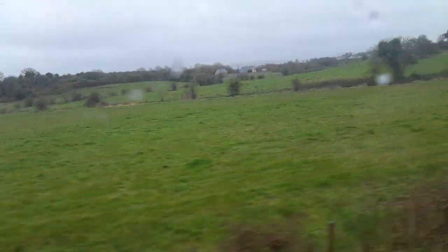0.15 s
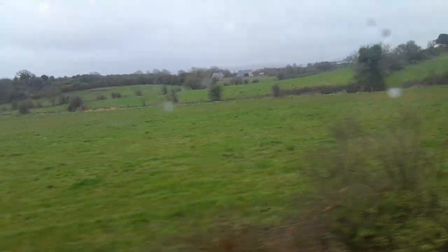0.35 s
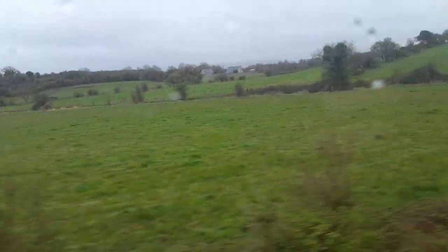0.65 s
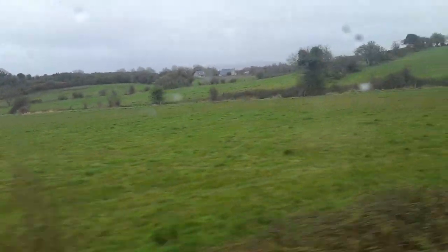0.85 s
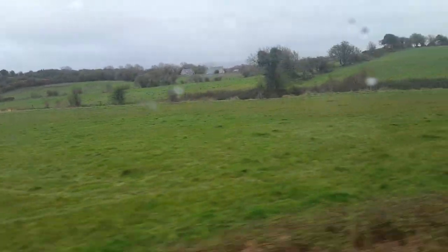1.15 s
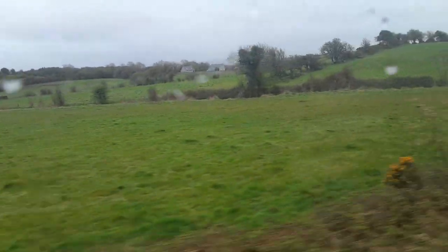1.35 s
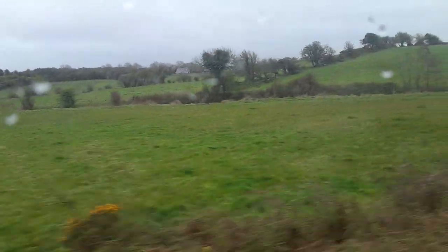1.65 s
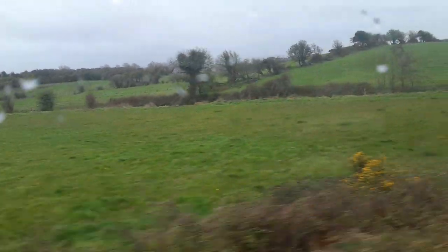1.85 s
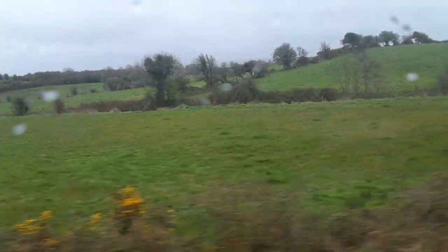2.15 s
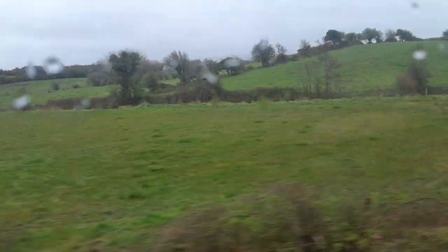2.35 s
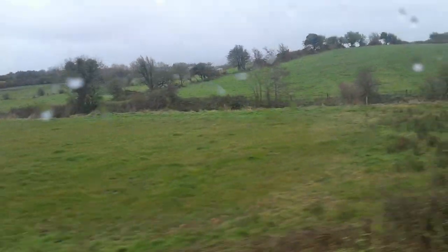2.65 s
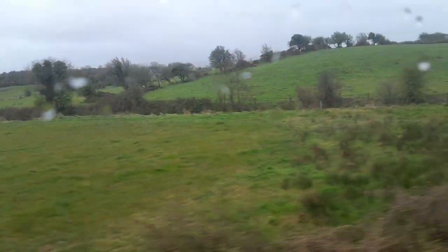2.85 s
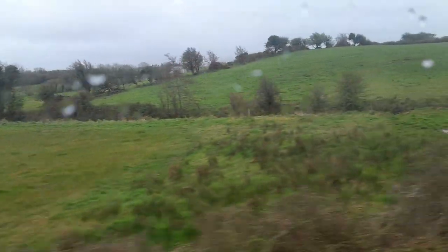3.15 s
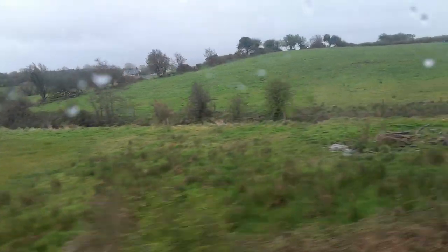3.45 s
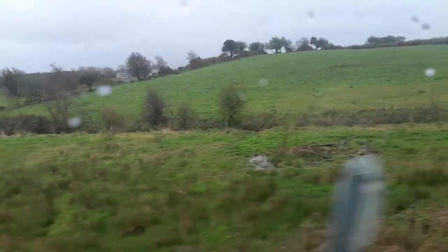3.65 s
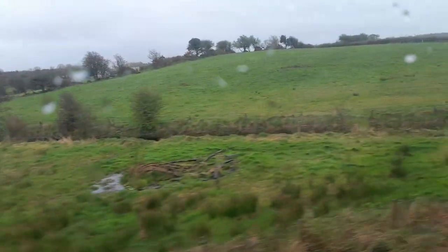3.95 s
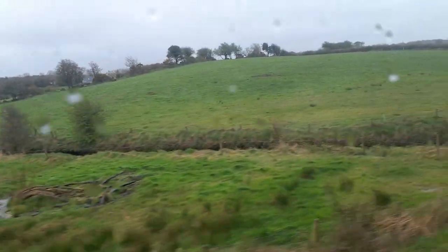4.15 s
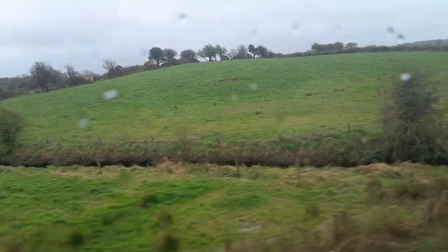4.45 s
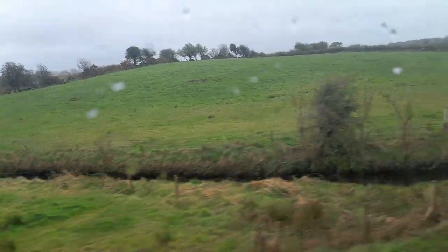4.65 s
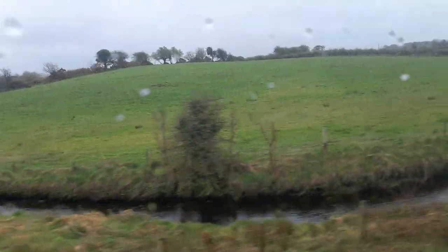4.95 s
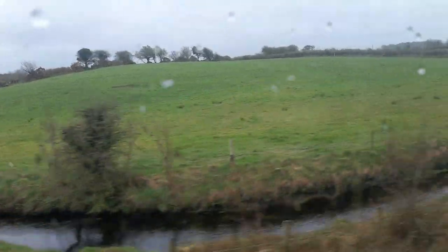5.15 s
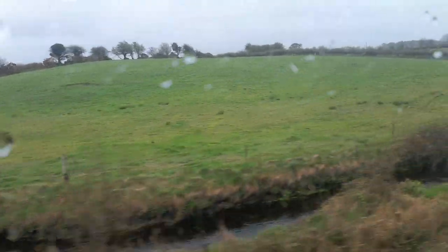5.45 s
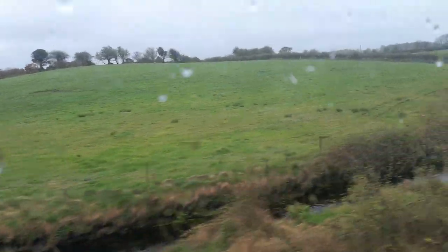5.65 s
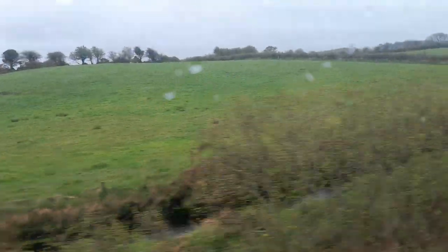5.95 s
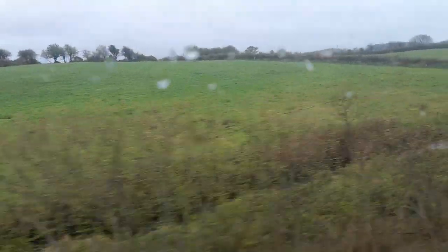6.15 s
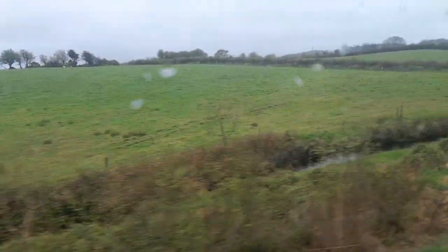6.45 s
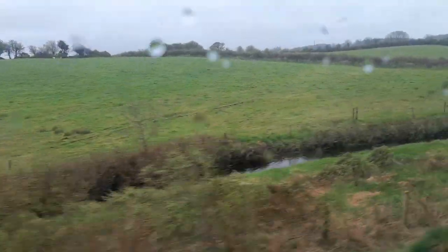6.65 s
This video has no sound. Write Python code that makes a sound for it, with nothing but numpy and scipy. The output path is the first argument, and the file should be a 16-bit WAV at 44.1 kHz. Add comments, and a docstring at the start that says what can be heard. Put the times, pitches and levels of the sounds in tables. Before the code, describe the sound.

Train carriage rumble with soft jolts, an engine surging up and falling away, a sharp burst of air, then a loud steady bass drone.

```python
"""First heard: wheels rumbling on the rails and the carriage air booming, from a window seat in a diesel train.
The underfloor engine revs up, sinks back, and after a puff from an air valve pulls with a loud steady drone.
Engine and machinery are sums of sines; air, wheels, panels and valves are shaped stereo noise.
A loose fitting ticks once per engine cycle while the engine revs.
Behind the microphone, an automatic gain ducks everything under the loud drone."""
import sys
import numpy as np
from scipy import signal
from scipy.fft import rfft, irfft, next_fast_len
from scipy.io import wavfile
from scipy.ndimage import uniform_filter1d, minimum_filter1d, map_coordinates

SR = 44100
rng = np.random.default_rng(int(sys.argv[2]) if len(sys.argv) > 2 else 0)


def unload_wav(signal):
    """Save mono or channel-first audio to the path in sys.argv[1] as 16-bit WAV at rate SR, clipped to [-1, 1]."""
    wavfile.write(
        sys.argv[1],
        SR,
        np.round(np.clip(np.atleast_2d(signal).T, -1, 1) * 32767).astype(np.int16),
    )


N = 300321

# Source levels are those ahead of the automatic gain. Tone tables give only the shape of a noise.

# Engine under the floor: speed [t/s, firing rate f/Hz]
ENGINE_SPEED = [(0, 50.13), (2.25, 48.87), (2.45, 55.4), (2.72, 65.35), (3.19, 86.65), (3.44, 96.16),
                (3.7, 101.6), (4.0, 99.3), (4.3, 94.05), (4.6, 75), (5.15, 58.47), (5.31, 73.5),
                (5.6, 77.4), (5.85, 76.6), (6.8, 76.64)]
# Engine load [t/s, level/dB against full load]
ENGINE_LOAD = [(0, -33), (1.9, -34.5), (2.24, -17), (2.36, 0), (3.55, 0.5), (3.7, -10.5), (4.3, -14),
               (4.7, -28.5), (5.15, -10.5), (5.26, -27.5), (5.32, -7), (5.7, 0.5), (6.8, 1)]
# Passage of engine tones into the carriage: two air modes, a dead spot between, then panels [f/Hz, level/dB]
CABIN_PASSAGE = [(45, -29.5), (53, -21), (66, -8), (76, -6.5), (82, -7.5), (88, -23), (92, -22), (98, -8.5),
                 (110, -18), (131, -6.5), (153, -12), (183, -14.5), (205, -15)]
# Floor resonance, as it passes the third harmonic of firing [harmonic f/Hz, level/dB against the octave]
FLOOR_RESONANCE = [(140, -11.5), (190, -8.5), (222, -8), (240, -21), (270, -16.5)]
# Weaker engine tones from unequal cylinders [multiple of the cycle rate, level/dB against the octave]
WEAK_ORDERS = [(9, -13), (10, -6.5), (14, -16.5), (15, -14.5), (21, -16.5), (24, -14.5), (30, -20.5)]
# Trim panels' effect on the weaker engine tones [f/Hz, level/dB]
TRIM_DAMPING = [(110, -0.5), (200, -.5), (255, -3), (305, 1.5), (335, -10.5), (420, -12)]
CYLINDERS = 6  # all fire once per cycle
OCTAVE_DB, OCTAVE_LOAD_SHARE = -9.5, 0.54  # octave against firing tone; how much it follows the load in dB
STRAIN_DB, STRAIN_HZ_PER_S = 1, 32  # overtones harden by this much when the firing rate rises this fast

# Steady booming of the carriage air [t/s, level/dB]
BOOM_LEVEL = [(0, -21), (2.1, -21), (2.5, -22), (4.6, -24.5), (6.8, -23)]
# Track jolts that swell the boom [t/s, level/dB]
TRACK_JOLTS = [(.55, -19), (1.03, -16.5), (1.24, -15), (1.35, -18.5), (1.56, -17), (1.92, -14.5),
               (2.06, -16.5), (3.22, -18.5), (5.15, -24)]
JOLT_HALF_S = 0.054
# Lowest air mode of the carriage [f/Hz, level/dB]
BOOM_SHAPE = [(15, -56.5), (25, -34.5), (35, -22.5), (50, -16.5), (66, -6.5), (76, -2), (84, -7.5),
              (94, -15.5), (125, -15.5), (160, -22), (250, -90.5)]

# Slow change of all the rolling noise [t/s, level/dB]
ROLLING_LEVEL = [(0, 0.84), (1.7, -0.6), (2.4, 0.3), (3.3, 0.4), (4.9, .3), (5.6, -0.3), (6.8, -1)]
# Rough rail [t/s, half length/s, panel rumble change level/dB, wheel roar change level/dB]
ROUGH_PATCHES = [(0.014, .08, 2.5, 6.5), (0.271, 0.06, -0.5, 5.5), (0.98, .1, -1.5, 2.5),
                 (1.454, .1, 1, 0.5), (2.056, 0.045, -4, 3.5), (2.48, 0.13, 3.5, 2.5), (3.875, 0.2, 4.5, 2),
                 (4.378, 0.046, 3.5, 1), (5.272, .05, 2, 1.5)]
RAIL_PATCH_SHARE = 0.52  # how much of the roar's change in dB the rail hiss shares
# Smooth-track levels in dB, before the slow change
PANEL_DB, ROAR_DB, RAIL_DB, HIGH_DB, FINE_DB = -26.5, -37.5, -42, -53.5, -68
# Panel rumble [f/Hz, level/dB]
PANEL_SHAPE = [(70, -22.5), (98, -6.5), (122, 0.5), (160, -2), (200, -2), (235, -1.5), (280, -7.5),
               (310, -6), (345, -8), (400, -11), (460, -20.5), (700, -64.5)]
# Wheel roar [f/Hz, level/dB]
ROAR_SHAPE = [(300, -29.5), (450, -1.5), (530, 2), (660, 1.5), (780, -2), (900, -3.5), (1050, -8.5),
              (1400, -15.5), (3000, -66)]
# Rail hiss [f/Hz, level/dB]
RAIL_SHAPE = [(700, -3), (1200, 2.5), (1800, 1.5), (2250, -1), (2600, -2), (3000, -3.5), (3900, -6.5),
              (4700, -14), (8000, -32), (16000, -64.5)]
# High hiss, rolling and swishes [f/Hz, level/dB]
HIGH_SHAPE = [(3000, -14.5), (4600, 1.5), (6000, 2), (7400, 1.5), (8300, -2.5), (9000, -17), (10300, -22.5),
              (15800, -21.5)]
# Finest hiss, also the shape of the microphone chain's own noise [f/Hz, level/dB]
FINE_SHAPE = [(7000, -21.5), (9000, -1), (10500, -2), (12300, 3.5), (15800, 2.5)]

# Air valves blowing off [t/s, jet level/dB before a 1.5 dB cut, jet t60/s, fizz level/dB, fizz hold/s,
# fizz t60/s, level/dB of each pipe resonance against the jet, first pipe f/Hz, second pipe f/Hz]
VALVE_PUFFS = [(1.564, -30, 0.41, -38.5, 0.1, 0.55, -7, 2460, 4224),
               (4.416, -38, 0.27, -38, .01, 0.27, -6, 2280, 5586),
               (5.145, -39, 0.52, -48.5, 0.027, 0.81, -8.5, 4186, 7250),
               (5.177, -21.5, 0.43, -30.5, 0.014, .24, -9.5, 2310, 4063),
               (5.52, -37, .35, -51, 0.013, 0.25, -8, 3450, 3830)]
# Air jet [f/Hz, level/dB]
JET_SHAPE = [(600, -28), (950, 3), (1300, -6.5), (1950, -4.5), (2350, -4), (2900, 0), (3500, 1.5),
             (4250, -2), (4800, -2.5), (5700, -0.5), (7800, -4), (8900, -13), (12000, -34)]
# Fine fizz of the valves [f/Hz, level/dB]
FIZZ_SHAPE = [(4000, -35.5), (7500, -7.5), (9500, -9), (11000, -2.5), (12500, 1), (15000, -0.5),
              (16000, -2.5)]

# Shaking of the loose fitting by the engine [t/s, tick level/dB before the attack]
FITTING_SHAKE = [(2.45, -47), (2.7, -41.5), (3.25, -37.5), (3.48, -36), (3.8, -45.5), (4.35, -49.5)]
# Stray ticks of the fitting [t/s, level/dB before the attack]
STRAY_TICKS = [(.785, -46), (6.495, -33.5), (6.722, -39.5)]
# Scrape of the fitting [f/Hz, level/dB]
TICK_SHAPE = [(3000, -43), (6000, -13.5), (8000, -9.5), (10500, -14.5), (11400, -6.5), (12100, -0.5),
              (13000, -6.5), (14000, -6), (15500, -3.5)]
TICK_SYNC_S, TICK_SCATTER_DB = 2.941, 2  # moment from which cycles are counted; spread from tick to tick

# Wall panel's drumming near 350 Hz, with a short surge as the engine takes up its pull [t/s, level/dB]
PANEL_DRUMMING = [(0, -35), (2.1, -36.5), (2.7, -48), (4.1, -45), (4.4, -38), (5.15, -47.5), (5.29, -32.5),
                  (5.38, -52), (6.8, -57.5)]
# On-board machinery tones, and two higher engine tones that join as the engine takes up its pull [start t/s,
# f/Hz, level/dB]
MACHINE_HUM = [(0, 312, -41.5), (0, 648, -61), (5.0, 533, -46), (5.0, 921, -53.5)]
# Soft treble swells [t/s, half length/s, high hiss level/dB, finest hiss level/dB]
SOFT_SWISHES = [(.45, 0.058, -65.5, -58), (0.866, 0.066, -64.5, -66), (2.3, .15, -53.5, -58.5),
                (3.251, .12, -54, -57), (5.993, .07, -51.5, -52), (6.22, 0.12, -49, -53),
                (6.476, 0.034, -52, -50)]
SING_S, SING_HALF_S, SING_DB = .5, .4, -49.5  # faint wheel song: middle, half length, peak
LEAK_S, LEAK_HALF_S, LEAK_DB = 4.95, .42, -55.5  # thin hiss: middle, half length, peak

# Likeness of the two channels in the carriage [f/Hz, left-right correlation]
STEREO_LIKENESS = [(60, 1), (125, 0.92), (250, 0.91), (500, 0.48), (1000, -0.21), (2000, -0.053),
                   (4000, -0.14), (12000, 0.047)]
# Stereo lean of the carriage noise [f/Hz, left minus right level/dB]
STEREO_BALANCE = [(60, 1.8), (200, 1), (400, 0), (1200, 0.5), (2400, -3), (4400, -4), (7000, 0), (10000, 9),
                  (14000, 3.5)]

# Microphone chain
THRESHOLD_DB, MAX_CUT_DB = -14.5, 6  # level where the automatic gain starts; deepest cut
METER_S, HOLD_S, GLIDE_S = 0.035, 0.43, 0.29  # listening time, hold, time constant of the gain's movement
SELF_NOISE_DB, TOP_HZ = -61, 15900  # own hiss, added after the gain; band limit


def amp(db):
    """Decibels to gain."""
    return 10 ** (np.asarray(db) / 20)


def unit(x):
    """Scale to rms 1."""
    return x / np.sqrt(np.mean(x ** 2) + 1e-20)


def along(points, hz):
    """Read (f/Hz, value) points on a log frequency axis."""
    f, v = np.transpose(points)
    return np.interp(np.log(hz + 1), np.log(f), v)


def curves(rows):
    """One value per sample for each column after the time."""
    s, *cols = np.transpose(rows)
    return [np.interp(np.arange(N) / SR, s, c) for c in cols]


def wobble(rate):
    """A smooth random curve, rate knots a second."""
    knots = rng.standard_normal(int(N * rate / SR) + 4)
    return map_coordinates(knots, [np.arange(N) * rate / SR])


def swell(s, half_s):
    """A smooth rise and fall of height 1 around time s."""
    return np.exp(-((np.arange(N) / SR - s) / half_s) ** 2)


def filtered(x, response):
    """Multiply the spectrum of x by a response of frequency."""
    m = next_fast_len(N + SR // 2)
    return irfft(rfft(x, m) * response(np.fft.rfftfreq(m, 1 / SR)), m)[..., :N]


def panned(x, left_db):
    """Lean a sound to the left by a level difference."""
    return x * amp(left_db * np.array([[.5], [-.5]]))


def cabin_noise(shape, ripple_db=1.5):
    """Stereo noise of rms 1 in the carriage: alike in both channels in the bass, diffuse in the treble."""
    ripple = rng.standard_normal(SR // 60)
    ripple_hz = np.linspace(0, SR / 2, len(ripple))

    def mid_side(hz):
        # a random ripple over frequency, drawn anew for each noise, roughens its colour above the bass
        rough_db = ripple_db * np.minimum(hz / 600, 1) * np.interp(hz, ripple_hz, ripple)
        turn = np.arccos(np.clip(along(STEREO_LIKENESS, hz), -1, 1)) / 2
        return amp(along(shape, hz) + rough_db) * [np.cos(turn), np.sin(turn)]

    mid, side = filtered(rng.standard_normal((2, N)), mid_side)
    stereo = np.array([mid + side, mid - side])
    return unit(filtered(stereo, lambda hz: panned(1, along(STEREO_BALANCE, hz))))


def resonance(hz, width_hz):
    """Stereo noise of rms 1 ringing in one resonance."""
    def ring_twice(f):
        return (1j * f * width_hz / (hz * hz - f * f + 1j * f * width_hz)) ** 2

    return unit(filtered(rng.standard_normal((2, N)), ring_twice))


def engine_cycles():
    """Engine cycles completed at each sample."""
    return np.cumsum(curves(ENGINE_SPEED)[0]) / SR / CYLINDERS


def engine():
    """Firing pulses make a deep tone set by load and resonance; unequal cylinders add weaker cycle multiples."""
    hz, load_db = curves(ENGINE_SPEED)[0], curves(ENGINE_LOAD)[0]
    rise_hz_per_s = uniform_filter1d(np.gradient(hz) * SR, size=SR // 10)
    strain = np.clip(rise_hz_per_s / STRAIN_HZ_PER_S, 0, 1)
    firing_db = load_db + along(CABIN_PASSAGE, hz)
    octave_db = OCTAVE_DB + OCTAVE_LOAD_SHARE * load_db + STRAIN_DB * strain
    octave_db += along(CABIN_PASSAGE, 2 * hz)
    third_db = octave_db + along(FLOOR_RESONANCE, 3 * hz)
    cycle = 2 * np.pi * engine_cycles()
    phase = CYLINDERS * cycle
    drone = amp(firing_db + .25 * wobble(12)) * np.sin(phase)
    drone += amp(octave_db + .8 * wobble(10)) * np.sin(2 * phase)
    drone += amp(third_db + 1.5 * wobble(6)) * np.sin(3 * phase)
    for multiple, db in WEAK_ORDERS:
        waver_db, drift = 2 * wobble(5), .35 * wobble(6)
        trim_db = along(TRIM_DAMPING, multiple * hz / CYLINDERS)
        tone = np.sin(round(multiple) * cycle + drift + rng.uniform(0, 2 * np.pi))
        drone += amp(octave_db + db + trim_db + waver_db) * tone
    return panned(np.sqrt(2) * drone, left_db=2.1)  # root 2 turns rms levels into sine peaks


def boom():
    """The track keeps the lowest air mode of the carriage ringing; each jolt swells it."""
    ring = cabin_noise(BOOM_SHAPE)
    ring_rms = np.sqrt(np.abs(uniform_filter1d(np.mean(ring ** 2, axis=0), size=SR // 12)))
    steady_power = amp(curves(BOOM_LEVEL)[0]) ** 2
    jolt_power = sum((amp(db) * swell(s, JOLT_HALF_S)) ** 2 for s, db in TRACK_JOLTS)
    evened_ring = ring / (ring_rms + 0.013)
    return np.sqrt(steady_power + jolt_power) * evened_ring


def rolling():
    """Rail roughness shakes the panels and makes the wheels roar and hiss, changing on rough patches."""
    panel_rise = sum(db * swell(s, half_s) for s, half_s, db, _ in ROUGH_PATCHES)
    roar_rise = sum(db * swell(s, half_s) for s, half_s, _, db in ROUGH_PATCHES)
    roughness = wobble(12)
    rail_db = RAIL_DB + RAIL_PATCH_SHARE * roar_rise + 0.55 * roughness
    panels = amp(PANEL_DB + panel_rise + 0.78 * wobble(7.6)) * cabin_noise(PANEL_SHAPE)
    roar = amp(ROAR_DB + roar_rise + 0.48 * roughness) * cabin_noise(ROAR_SHAPE)
    rails = amp(rail_db) * cabin_noise(RAIL_SHAPE)
    high = amp(HIGH_DB + 1.4 * wobble(12)) * cabin_noise(HIGH_SHAPE)
    fine = amp(FINE_DB + 1.5 * wobble(9)) * cabin_noise(FINE_SHAPE)
    return amp(curves(ROLLING_LEVEL)[0]) * (panels + roar + rails + high + fine)


def air_valves(attack_s=0.0036):
    """Each valve opens sharply and rings its pipe; the jet fades with the pressure, the fizz may hang on."""
    jet_noise = cabin_noise(JET_SHAPE)
    fizz_noise = panned(cabin_noise(FIZZ_SHAPE), left_db=-3.5)
    out = np.zeros((2, N))
    for s, jet_db, jet_t60, fizz_db, hold, fizz_t60, pipe_db, *pipe_hz in VALVE_PUFFS:
        t = np.maximum(np.arange(N) / SR - s, 0)
        pipe = panned(sum(resonance(hz, width_hz=260) for hz in pipe_hz), left_db=-6.5)
        jet = amp(jet_db - 1.5 - 60 * t / jet_t60) * (jet_noise + amp(pipe_db) * pipe)
        fizz = amp(fizz_db - 60 * np.maximum(t - hold, 0) / fizz_t60) * fizz_noise
        opening = 1 - np.exp(-t / attack_s)
        out += opening * (jet + fizz)
    return out * amp(0.78 * wobble(110))  # jet and fizz flutter


def fitting(attack_s=0.0021, t60_s=0.088):
    """The loose fitting scrapes briefly and brightly once per engine cycle while shaken, plus stray ticks."""
    cycles = engine_cycles()
    cycles_from_sync = cycles - cycles[round(TICK_SYNC_S * SR)]
    times = np.flatnonzero(np.diff(np.floor(cycles_from_sync))) / SR
    shake_s, shake_db = np.transpose(FITTING_SHAKE)
    ticks = list(STRAY_TICKS)
    for s in times:
        if shake_s[0] < s < shake_s[-1]:
            scatter_db = TICK_SCATTER_DB * rng.standard_normal()
            ticks.append((s, np.interp(s, shake_s, shake_db) + scatter_db))
    level = np.zeros(N + SR)
    t = np.arange(SR // 4) / SR
    for s, db in ticks:
        level[round(s * SR):][:len(t)] += amp(db - 60 * t / t60_s) * (1 - np.exp(-t / attack_s))
    return panned(level[:N] * cabin_noise(TICK_SHAPE), left_db=-1.5)


def wall_panel():
    """A wall panel drums in one broad resonance, alike in both channels, its level wavering at random."""
    drum = panned(resonance(hz=349.5, width_hz=95)[0], left_db=1.0)
    return amp(curves(PANEL_DRUMMING)[0] + 3.2 * wobble(7)) * drum


def machinery():
    """Fans and pumps hum at fixed pitches; two higher engine tones fade in at 5 s as the engine pulls; all
    waver in level and phase."""
    t = np.arange(N) / SR
    hum = np.zeros(N)
    for start, hz, db in MACHINE_HUM:
        fade_in = np.clip((t - start) / 0.29, 0, 1)
        tone = np.sin(2 * np.pi * hz * t + .9 * wobble(14))
        hum += fade_in * amp(db + 2.2 * wobble(4)) * tone
    return np.sqrt(2) * hum


def swishes():
    """Now and then the treble swells softly, as two bands of noise."""
    high, fine = cabin_noise(HIGH_SHAPE), cabin_noise(FINE_SHAPE)
    out = np.zeros((2, N))
    for s, half_s, high_db, fine_db in SOFT_SWISHES:
        out += swell(s, half_s) * (amp(high_db) * high + amp(fine_db) * fine)
    return out


def wheel_song():
    """A flange brushes the rail and rings one mode of the wheel."""
    level = amp(SING_DB + wobble(16)) * swell(SING_S, SING_HALF_S)
    return panned(level * resonance(hz=2590, width_hz=610), left_db=-1)


def thin_hiss():
    """A narrow band of high noise grows while the engine sinks back, then fades."""
    level = amp(LEAK_DB + 1.2 * wobble(11)) * swell(LEAK_S, LEAK_HALF_S)
    return level * resonance(hz=6850, width_hz=1600)


def scene():
    """Everything heard from a window seat, ahead of the microphone chain."""
    main = engine() + boom() + rolling() + air_valves() + fitting()
    background = wall_panel() + machinery() + swishes() + wheel_song() + thin_hiss()
    return main + background


def gain_control(x):
    """Gain that glides down when the sound passes the threshold, holds, and glides back."""
    def lag(v, s):
        return signal.lfilter([1 / (s * SR)], [1, 1 / (s * SR) - 1], v)

    level_db = 10 * np.log10(lag(np.mean(x ** 2, axis=0), METER_S) + 1e-12)
    wanted_db = np.clip(THRESHOLD_DB - level_db, -MAX_CUT_DB, 0)
    hold = int(HOLD_S * SR)
    # the origin makes the window look back only
    held_db = minimum_filter1d(wanted_db, size=hold, origin=(hold - 1) // 2, mode="nearest")
    return amp(lag(held_db, GLIDE_S))


def record(dry):
    """The microphone chain rides its gain, adds a faint hiss and keeps nothing above its band limit."""
    self_noise = amp(SELF_NOISE_DB) * cabin_noise(FINE_SHAPE)
    sound = dry * gain_control(dry) + self_noise
    return filtered(sound, lambda hz: hz < TOP_HZ)


dry = scene()
out = record(dry)
unload_wav(out)
```